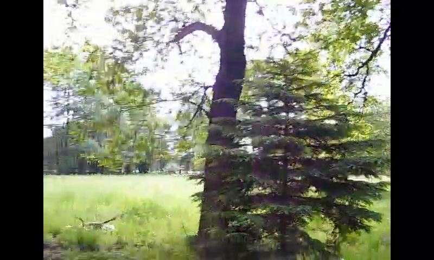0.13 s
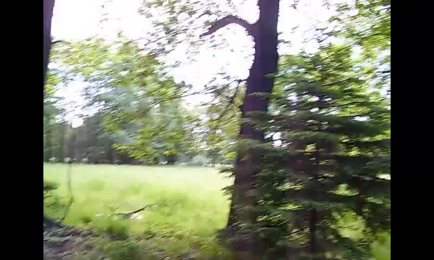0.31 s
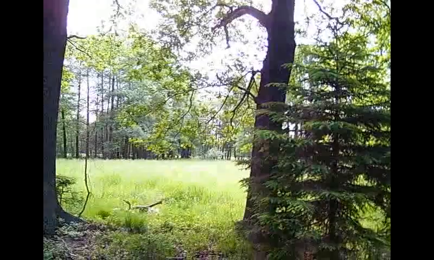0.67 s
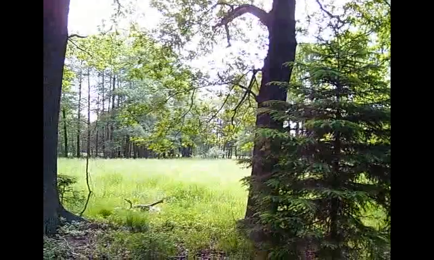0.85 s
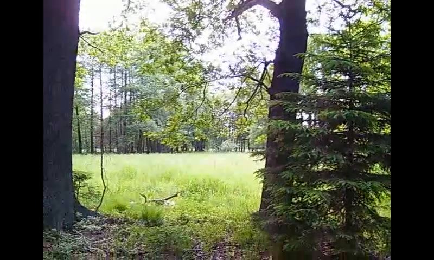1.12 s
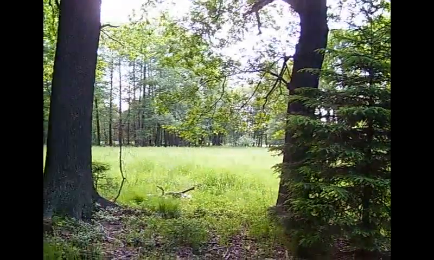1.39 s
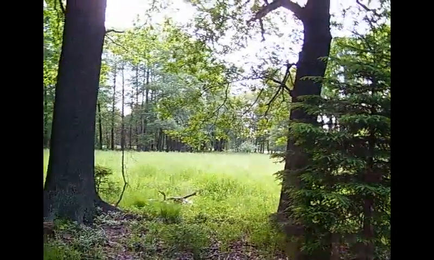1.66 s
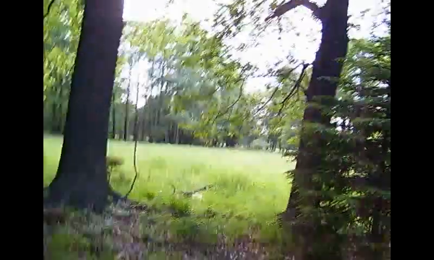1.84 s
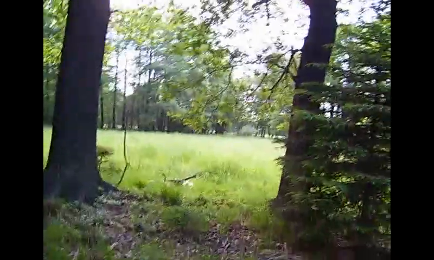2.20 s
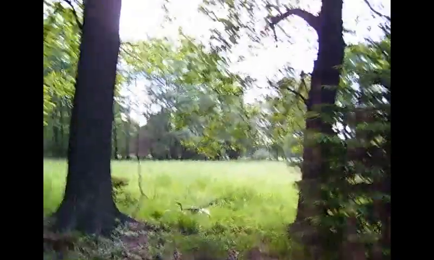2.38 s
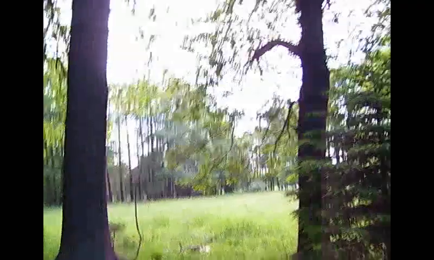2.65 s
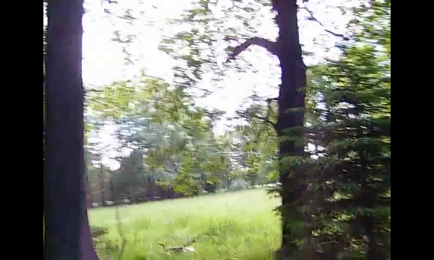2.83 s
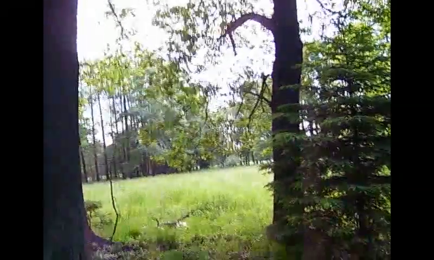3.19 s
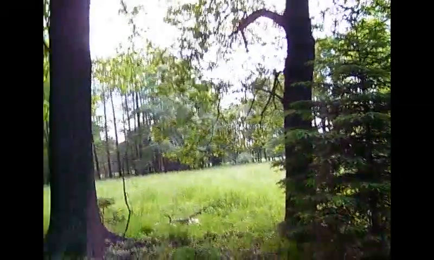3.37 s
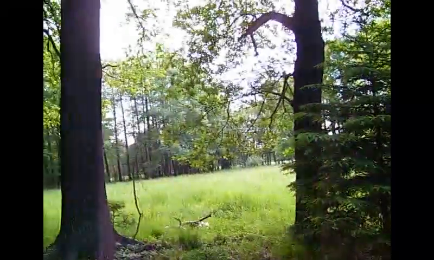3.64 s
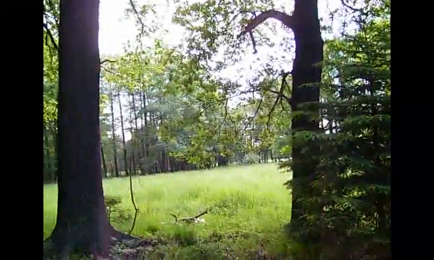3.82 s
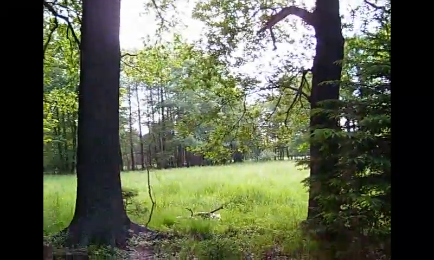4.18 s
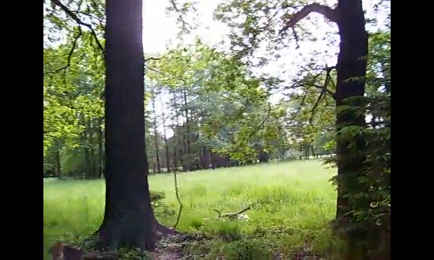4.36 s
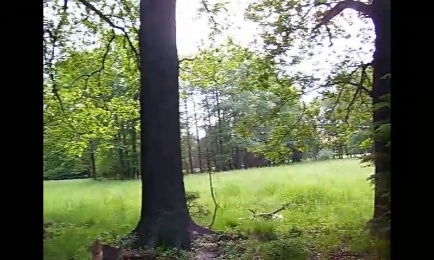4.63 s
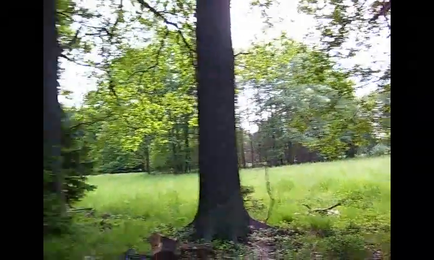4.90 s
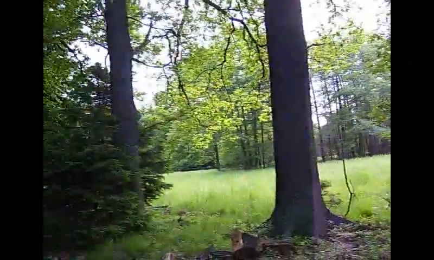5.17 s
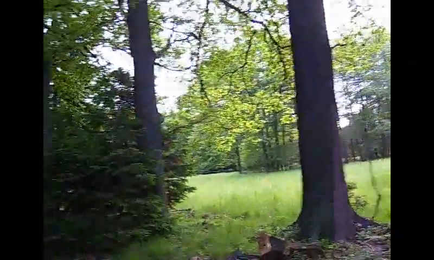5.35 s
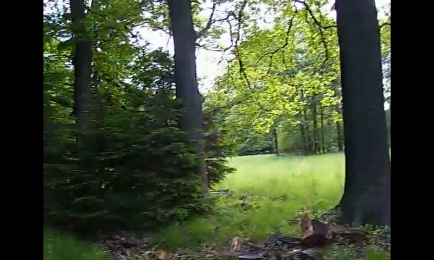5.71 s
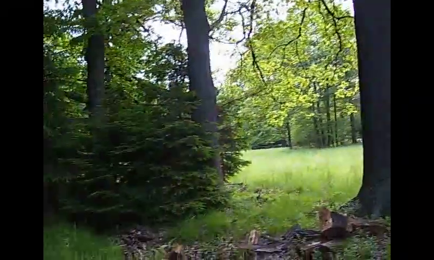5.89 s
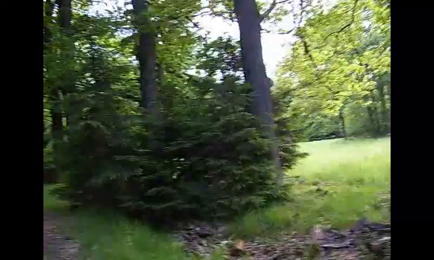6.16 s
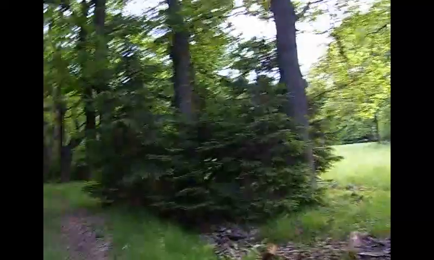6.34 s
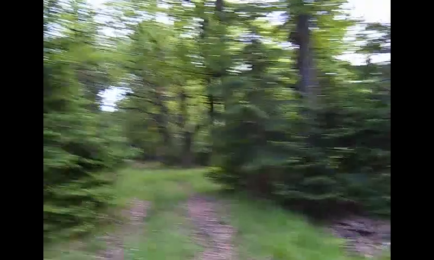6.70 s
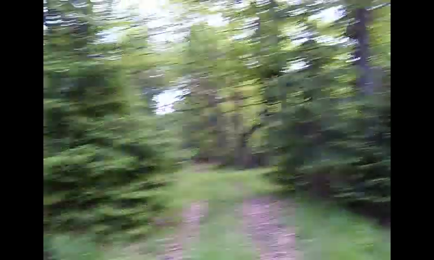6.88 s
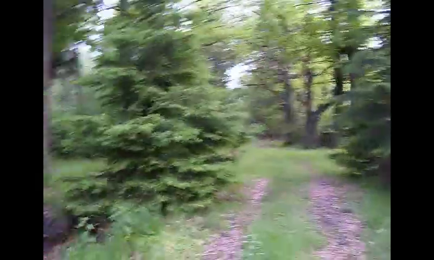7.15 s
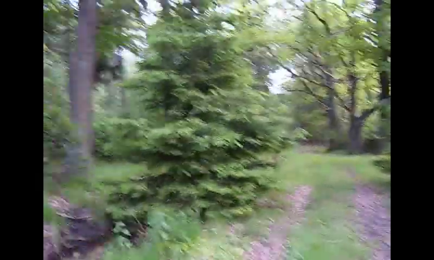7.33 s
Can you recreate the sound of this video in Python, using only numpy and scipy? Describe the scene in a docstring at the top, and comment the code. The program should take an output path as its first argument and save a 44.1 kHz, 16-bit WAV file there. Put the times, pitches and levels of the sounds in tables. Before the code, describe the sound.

At a quiet woodland edge, a soft hush of leaves lies under faint bird whistles and a small motor chugging inside the camera. Litter rustles lightly, then very loud dry cracks and knocks burst in clusters, distorting the close, dull low-quality microphone. Later it calms to light crackling, a few small knocks and soft footfall thumps.

```python
"""Sharp cracks and knocks, likely handling of the camera, stand close to the microphone over crunching litter.
Someone carrying a small camera treads at the edge of a quiet wood: noise bursts through resonances make
the knocks, clumped grains the litter. Far birds are gliding sines over the filtered noise of the leaves;
the focus motor chugs faintly in the camera body, a pulsed scrape. The loudest knocks overload the input."""
import sys
import numpy as np
from scipy import signal
from scipy.fft import rfft, irfft, next_fast_len
from scipy.io import wavfile

SR = 44100
rng = np.random.default_rng(int(sys.argv[2]) if len(sys.argv) > 2 else 0)


def pcm_store(signal):
    """Save signal as 16-bit PCM."""
    levels = np.round(np.clip(np.atleast_2d(signal), -1, 1) * 32767)
    wavfile.write(sys.argv[1], SR, levels.astype(np.int16).T)


def to_linear_factor(level_db):
    """Convert decibel levels (scalar or array-like) to linear amplitude factors."""
    exponent = np.asarray(level_db, float) / 20
    return 10 ** exponent


N = 331511

# Sharp cracks and knocks, likely handling of the camera: t/s, crack peak level/dB, crack pitch f/Hz,
# share of the crack that shakes the camera body level/dB, thud re crack peak level/dB
KNOCKS = [(0.131, -25, 1040, -11, -30), (.419, -21.5, 900, -10, -3), (1.984, -18.5, 1305, -2, -8),
          (2.077, -6.5, 970, -31, -37), (2.109, -8.5, 1160, -9.5, -38.5), (2.158, -8.5, 1360, 12.5, -45.5),
          (2.169, -13, 1400, 1, -32), (2.235, -16.5, 800, -19, -24), (2.266, -15.5, 910, -15, -32),
          (2.46, -23, 1500, -14, -9), (2.51, -9.5, 2400, -12, -10), (2.532, 10, 2220, 0, -24),
          (2.535, 15, 1503, -1.5, -33.5), (2.823, 9.5, 1840, -4, -17), (2.84, 14, 2850, -20.5, -13),
          (2.843, 7, 2190, -10, -21.5), (2.849, -5, 2690, -9, -7), (2.862, -1.5, 2700, -12, -16),
          (2.866, 12, 2650, -15.5, -39), (2.867, 2.5, 893, -8.5, -24.5), (2.887, -10, 1420, -10, -30),
          (2.939, 8, 1800, -28.5, -17.5), (2.943, 3, 1240, -8.5, -29), (3.002, -24.5, 1120, -17, 4),
          (3.049, -20, 1530, -8, -32), (3.229, 7, 1183, -22, -33), (3.275, -14, 1670, -18, -37),
          (3.363, -14.5, 970, -12, -9.5), (3.554, -17, 1200, -8, -1.5), (3.674, 13.5, 1867, 1.5, -8.5),
          (3.685, 1.5, 1984, -30, -27), (3.691, 2.5, 1950, -18, -14.5), (3.71, -4, 1640, -16, -4.5),
          (3.726, 6, 1695, -16, -29.5), (3.739, 14, 1924, -11.5, -16), (3.762, 4, 1900, -3.5, -34),
          (3.765, 1.5, 1890, -9, -25), (3.77, 11, 1996, -6, -27.5), (3.774, 6, 1970, -16.5, -18),
          (3.795, 1.5, 1150, 3, -8.5), (3.952, -24, 1480, -19.5, -32), (4.001, -11.5, 1270, -21, -25),
          (4.276, -19, 1340, -14, -42), (4.433, -25.5, 900, -16, -4), (4.47, -24, 2240, -12, -12),
          (4.902, -26, 1410, -12, -29), (5.221, -27, 800, -11, -9), (5.942, -26, 1060, -12, 2.5),
          (6.318, -6.5, 1890, -14, -21.5), (6.331, -9, 2200, -11, -11), (6.349, -12.5, 840, -13, -8),
          (6.454, -13.5, 2490, -13, -21.5), (6.454, -8, 2420, -11, -30.5), (6.456, -11, 1256, -10, -25.5),
          (6.568, -27.5, 810, -13, 5.5), (6.607, -15.5, 1170, -6, -38), (6.645, -14, 1117, -15, -31)]
# Drawn-out scrapes, the first a long chirp of the motor: start t/s, length t/s, level/dB, centre f/Hz
SCRAPES = [(0.205, 0.051, -34, 1650), (2.003, 0.021, -35, 2200), (2.071, 0.092, -29, 875),
           (2.138, 0.056, -26.5, 1300), (2.162, 0.17, -30.5, 784), (2.657, 0.027, -19, 2230),
           (2.714, 0.033, -32, 1800), (2.808, 0.023, -15.5, 1380), (2.818, 0.026, -13.5, 1530),
           (2.841, 0.039, -14.5, 2200), (2.909, 0.015, -21.5, 2190), (2.923, 0.045, -24.5, 1000),
           (3.678, 0.077, -18, 1566), (3.721, 0.028, -14, 1806), (3.754, 0.034, -17.5, 1978),
           (3.763, .037, -15.5, 1140), (6.293, 0.05, -36, 1760), (6.557, 0.16, -34.5, 1040)]
# Ringing of the camera body: f/Hz, gain level/dB, 60 dB decay t/s
BODY_MODES = [(410, 3, .11), (505, 3, .1), (720, -2, .06), (1385, -1, .17), (1404, -3, .12),
              (1670, -8, .05)]
# Soft low thumps, footfalls and a handling bump: t/s, peak level/dB
THUMPS = [(.004, -28), (3.555, -21.5), (4.433, -24.5), (5.221, -35), (5.941, -29), (6.348, -26)]
# Litter under the soles, a curve in time: t/s, dull crush level/dB, crisp crackle level/dB
LITTER_LEVELS = [(0.0, -40, -31.5), (.31, -44, -35.5), (.65, -51.5, -39), (1.59, -55, -44.5),
                 (2.2, -37.5, -31.5), (2.53, -39.5, -25), (2.72, -35.5, -24.5), (2.89, -25.5, -22),
                 (3.03, -45, -38), (3.27, -46, -55), (3.68, -39, -53), (3.81, -51, -38.5),
                 (4.94, -52.5, -38), (5.36, -44.5, -36), (5.67, -50, -44), (6.09, -39.5, -37.5),
                 (6.6, -38, -35), (6.89, -42, -30.5), (7.16, -41, -37.5), (7.52, -38, -30.5)]
# Relative spectrum of damp leaves crushing: f/Hz, level/dB per Hz
CRUSH_SPECTRUM = [(35, -56), (60, -29), (256, -10), (334, -10), (372, -4.5), (717, -4.5), (1470, -7),
                  (2500, -22), (3250, -40.5), (5500, -120)]
# Relative spectrum of dry stalks crackling: f/Hz, level/dB per Hz
CRACKLE_SPECTRUM = [(600, -27.5), (1100, -17.5), (1500, -2.5), (2200, -6), (2900, -8), (3600, -14),
                    (4500, -4.5)]
# Runs of the focus motor: first turn t/s, length t/s, turning rate f/Hz, level at the peak of the run/dB
MOTOR_RUNS = [(0.137, 0.51, 21.16, -41.5), (0.554, 0.47, 21.63, -44), (1.606, 0.42, 22.34, -50.5),
              (3.045, 0.28, 22.7, -46), (3.869, .42, 21.9, -43.5), (4.318, 0.49, 21.58, -43),
              (5.458, 0.55, 21.23, -46), (7.01, 0.26, 22, -38.5), (7.24, 0.23, 21.8, -44)]
# Resonances of the camera housing under the motor: f/Hz, width f/Hz, relative level/dB
HOUSING_MODES = [(1640, 110, -1.5), (2136, 180, -6.5), (3170, 280, -17.5), (1000, 610, -25)]
# Far bird notes: start t/s, length t/s, first pitch f/Hz, glide f/Hz, level before the flutter/dB
BIRD_NOTES = [(0.304, 0.18, 1623, 213.5, -44), (1.01, 0.076, 2580, 523, -50),
              (3.374, 0.2, 2500, 322, -51.5), (3.57, 0.05, 2670, -240, -46), (4.21, 0.095, 2740, 91, -50.5),
              (4.5, .06, 3170, -17, -48), (4.589, 0.12, 2595, 125, -52), (4.666, 0.16, 3080, -41.5, -49),
              (4.866, .047, 2310, 28.5, -51), (4.898, 0.15, 2800, -150, -51),
              (4.963, .068, 3120, -180, -49), (5.043, 0.15, 2600, -11, -53),
              (5.149, 0.092, 2910, -285, -46), (5.137, .11, 3436, -500, -49.5),
              (5.435, 0.11, 2690, -7, -52), (5.732, 0.064, 2730, -63, -50),
              (5.83, 0.15, 2620, -38.5, -49.5), (6.36, .083, 2500, 29, -48.5),
              (6.482, .097, 2650, -140, -49), (6.785, 0.13, 2670, -150, -48),
              (7.375, 0.089, 2580, -37, -46.5)]
# Relative spectrum of leaves and distance: f/Hz, level/dB per Hz
HUSH_SPECTRUM = [(15, -41), (25, -11.5), (317, 0.5), (361, -1), (606, 0), (994, -4), (1060, -2),
                 (1340, -6.5), (2070, -12), (2680, -4.5), (4300, -6), (5590, -28), (9460, -120)]


def rms_one(x):
    """Scale to unit rms."""
    return x / np.sqrt(np.mean(x ** 2) + 1e-20)


def in_time(rows):
    """Columns of a curve, interpolated at every sample."""
    s, *columns = np.transpose(rows)
    return [np.interp(np.arange(N) / SR, s, column) for column in columns]


def coloured(x, spectrum):
    """Give x the spectrum, straight lines on a log-frequency axis; rms 1."""
    hz, db = np.transpose(spectrum)
    size = next_fast_len(N)
    log_hz = np.log(np.arange(1, size // 2 + 2) * SR / size)
    gain = to_linear_factor(np.interp(log_hz, np.log(hz), db))
    return rms_one(irfft(rfft(x, size) * gain, size)[:N])


def resonate(x, hz, width_hz):
    """Two-pole resonance with gain 1 on top."""
    r = np.exp(-np.pi * width_hz / SR)
    poles = [1, -2 * r * np.cos(2 * np.pi * hz / SR), r * r]
    return signal.lfilter([(1 - r * r) / 2, 0, (r * r - 1) / 2], poles, x)


def drift(rate_hz):
    """Chance wandering: normal values with spread 1, rate_hz of them a second, joined by straight lines."""
    knots = rng.standard_normal(int(N / SR * 200) + 2)
    return np.interp(np.arange(N) / SR * rate_hz, np.arange(len(knots)), knots)


def grains(per_s, spread_db):
    """Random tiny clicks of uneven size and sign."""
    sizes = to_linear_factor(spread_db * np.minimum(rng.exponential(1, N), 5))
    signs = rng.choice([-1, 1], N)
    return sizes * signs * (rng.random(N) < per_s / SR)


def knocks():
    """A dying noise burst excites a pitched crack and a low thud; also returns what shakes the camera body."""
    burst_s, kick_s = 2.54e-3, 0.00019  # decay times of the burst and of its first jerk
    size = SR // 8
    age = np.arange(size) / SR
    out, shake = np.zeros(N + size), np.zeros(N + size)
    noises = rng.standard_normal((len(KNOCKS), size))
    for (s, db, hz, shake_db, thud_db), noise in zip(KNOCKS, noises):
        kick = 2.51 * np.exp(-age / kick_s)
        burst = (noise + kick) * np.exp(-age / burst_s)
        tone = resonate(resonate(burst, hz, 0.42 * hz), hz, 2.23 * hz)
        edge = to_linear_factor(-27) * resonate(burst, 3300, 2900)  # broad treble
        crack = tone + edge
        crack = to_linear_factor(db) * crack / np.abs(crack).max()
        thud = resonate(resonate(burst, 430, 370), 440, 1200)
        thud = to_linear_factor(db + thud_db) * thud / np.abs(thud).max()
        first = round(s * SR)
        out[first:first + size] += crack + thud
        shake[first:first + size] += to_linear_factor(shake_db) * crack + thud
    return out[:N], shake[:N]


def scrapes():
    """Drawn-out scrapes and a motor chirp: a dense, clumpy patter of slips around one pitch."""
    relative_width = 0.65  # width of the band as a share of its centre
    t, out = np.arange(N) / SR, np.zeros(N)
    slips = grains(4000, spread_db=3.0) * to_linear_factor(2.5 * drift(120.0))
    for start, length, db, hz in SCRAPES:
        on = (t > start) & (t < start + length)
        swell = np.sin(np.pi * (t[on] - start) / length) ** 0.52
        width_hz = relative_width * hz
        band = resonate(resonate(slips[on], hz, width_hz), hz, 2 * width_hz)
        out[on] += to_linear_factor(db) * swell * rms_one(band)
    return out


def camera_body():
    """Knocks and scrapes, and the camera body that they set ringing in decaying modes."""
    struck, shake = knocks()
    scraping = scrapes()
    shake = shake + to_linear_factor(-4.5) * scraping + 1e-18
    ringing = np.zeros(N)
    for hz, db, t60 in BODY_MODES:
        width_hz = np.log(1000) / np.pi / t60
        ringing += to_linear_factor(db) * resonate(shake, hz, width_hz)
    low_cut = signal.butter(1, 150, "highpass", fs=SR, output="sos")
    return signal.sosfilt(low_cut, struck + scraping + ringing)


def thumps():
    """Soft low thumps, footfalls and a handling bump: each a short low puff of noise."""
    hz, width_hz, decay_s = 229, 270, 5.6e-3
    size = SR // 8
    out, age = np.zeros(N + size), np.arange(size) / SR
    for (s, db), noise in zip(THUMPS, rng.standard_normal((len(THUMPS), size))):
        puff = noise * np.exp(-age / decay_s)
        puff = resonate(resonate(puff, hz, width_hz), hz, 2 * width_hz)
        first = round(s * SR)
        out[first:first + size] += to_linear_factor(db) * puff / np.abs(puff).max()
    return out[:N]


def litter():
    """Dense clumped grains: damp leaves crush dully, dry stalks crackle."""
    crush_db, crackle_db = in_time(LITTER_LEVELS)
    crush = coloured(grains(2500, spread_db=1.0), CRUSH_SPECTRUM)
    crush = crush * to_linear_factor(crush_db + 3.2 * drift(60.0))
    crackle = coloured(grains(3000, spread_db=-2.0), CRACKLE_SPECTRUM)
    crackle = crackle * to_linear_factor(crackle_db + 1.3 * drift(90.0))
    return crush + crackle


def motor():
    """Gears scrape harder for part of each turn and set the housing ringing; the motor works in runs."""
    rise_s, peak_at, idle_db = 0.062, 0.29, -59  # peak_at: share of the run, lead-in included
    t = np.arange(N) / SR
    run_starts = [row[0] - rise_s for row in MOTOR_RUNS]
    run = np.clip(np.searchsorted(run_starts, t) - 1, 0, None)
    first_turn, length, turns_hz, db = np.array(MOTOR_RUNS)[run].T
    age = t - first_turn
    turns = turns_hz * age

    # a run swells to its peak, fades, then idles
    along = np.clip((age + rise_s) / (length + rise_s), 0, 1)
    load = np.sqrt(np.interp(along, [0, peak_at, 1], [0, 1, 0]))
    level = to_linear_factor(idle_db) + load * to_linear_factor(db)

    # every turn bites differently
    bite_db = 2.0 * rng.standard_normal((len(MOTOR_RUNS), 60))
    bite = to_linear_factor(bite_db[run, np.round(turns).astype(int)])
    engaged = np.clip(0.5 + np.cos(2 * np.pi * turns), 0.15, 1)
    scrape = engaged * rng.standard_normal(N)
    ringing = sum(to_linear_factor(mode_db) * resonate(scrape, hz, width_hz) for hz, width_hz, mode_db in HOUSING_MODES)
    return level * bite * rms_one(ringing)


def birds():
    """Far gliding whistles, made fluttery and smeared by echoes among the trunks."""
    t, out = np.arange(N) / SR, np.zeros(N)
    warble_hz = 45 * drift(70.0)  # unsteadiness of the whistled pitch
    for start, length, first_hz, glide_hz, db in BIRD_NOTES:
        on = (t > start) & (t < start + length)
        along = (t[on] - start) / length
        hz = first_hz + glide_hz * along + warble_hz[on]
        swell = np.sin(np.pi * along) ** 0.13
        out[on] += to_linear_factor(db) * swell * np.sin(2 * np.pi * np.cumsum(hz) / SR)
    flutter = 0.24 + 0.98 * drift(150.0)
    echo_age = np.arange(SR // 4) / SR
    echoes = rng.standard_normal(SR // 4) * np.exp(-echo_age / 0.04)
    return out * flutter + to_linear_factor(-27.5) * signal.fftconvolve(out, echoes)[:N]


def hush():
    """Leaves and distance: steady coloured noise whose level wanders slightly."""
    return to_linear_factor(-47 + 0.29 * drift(4.8)) * coloured(rng.standard_normal(N), HUSH_SPECTRUM)


def scene():
    """Everything reaches one microphone."""
    return (camera_body() + thumps() + litter() + motor() + birds() + hush())[None]


def roll_off(x):
    """The treble ends steeply here."""
    return signal.sosfilt(signal.butter(12, 15800, fs=SR, output="sos"), x)


def record(dry):
    """Sampled at 8 kHz and clipped; the stretch to full rate leaves a mirror above 4 kHz, then clips again."""
    dull = signal.sosfilt(signal.butter(4, 3500, fs=SR, output="sos"), dry)
    coarse = np.clip(signal.resample_poly(dull, 80, 441, axis=1), -1, 1)  # the input overloads here
    # a gentle slope centred on 4 kHz lets part of the mirror through
    smooth = signal.firwin(441 * 16 + 1, 4000, window=("kaiser", 9.0), fs=80 * SR)
    full = signal.resample_poly(coarse, 441, 80, axis=1, window=smooth)[:, :N]
    full = np.pad(full, [(0, 0), (0, N - full.shape[1])])
    finished = np.clip(0.93 * full, -1, 1)  # overshoots of the stretch
    return roll_off(finished)


dry = scene()
out = record(dry)
pcm_store(out)
```